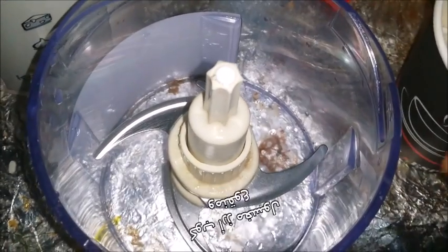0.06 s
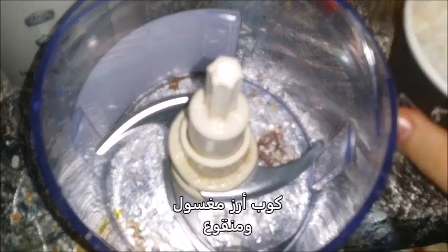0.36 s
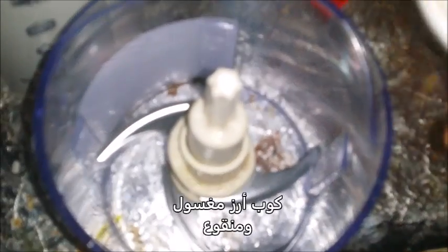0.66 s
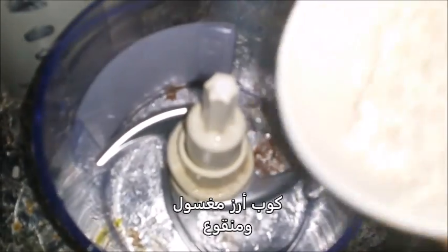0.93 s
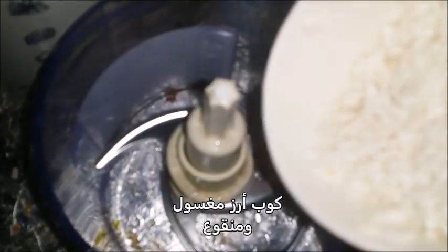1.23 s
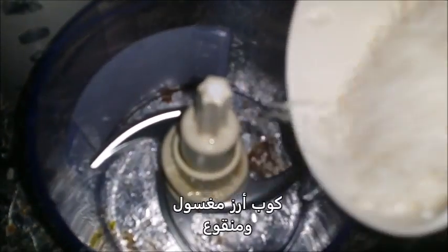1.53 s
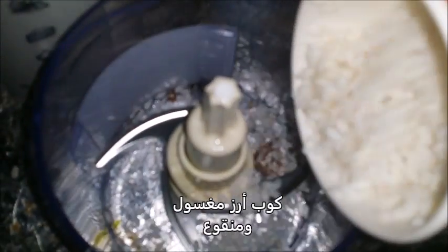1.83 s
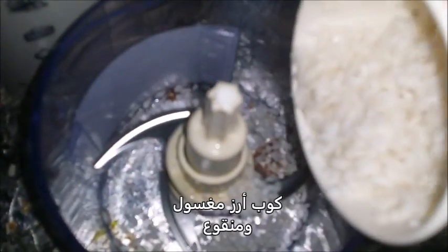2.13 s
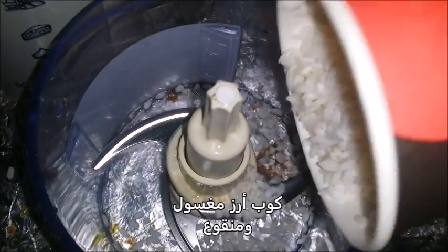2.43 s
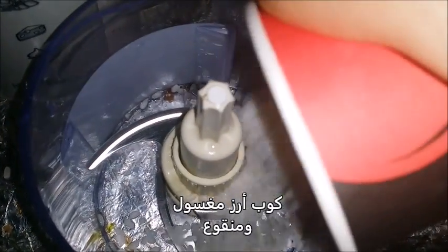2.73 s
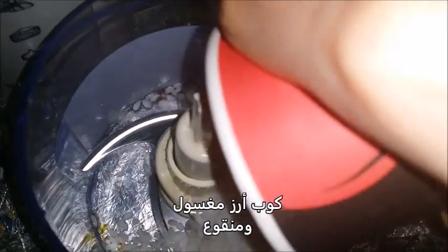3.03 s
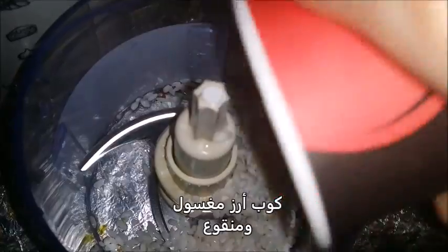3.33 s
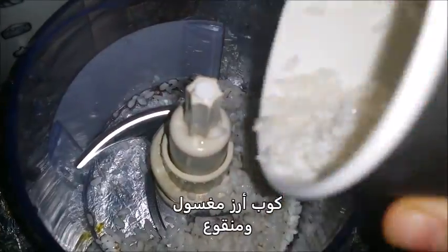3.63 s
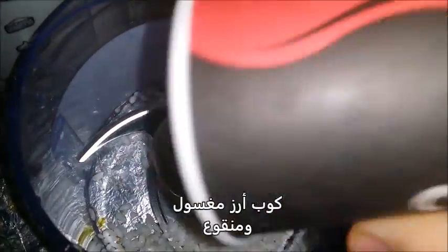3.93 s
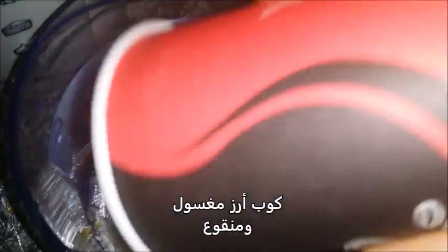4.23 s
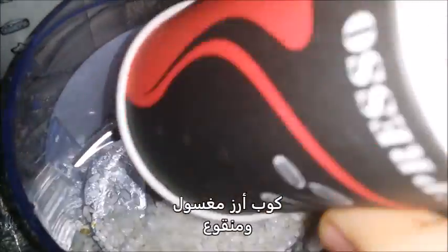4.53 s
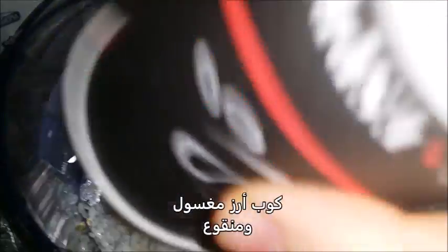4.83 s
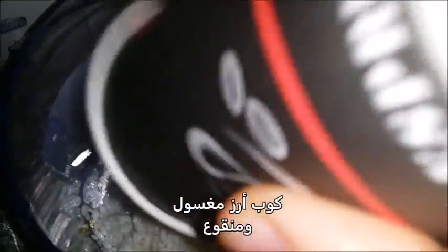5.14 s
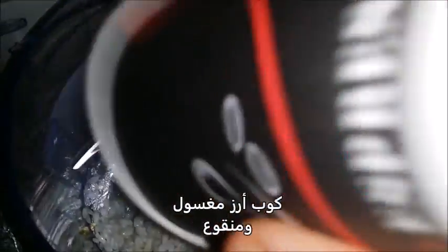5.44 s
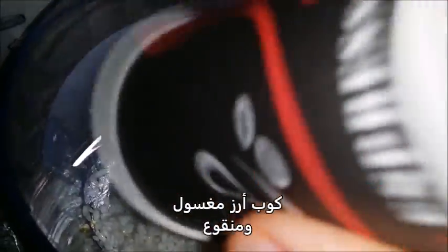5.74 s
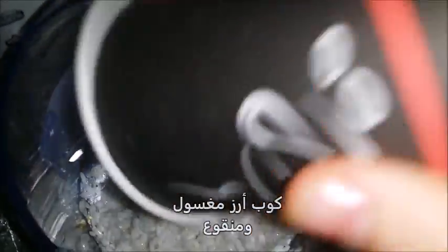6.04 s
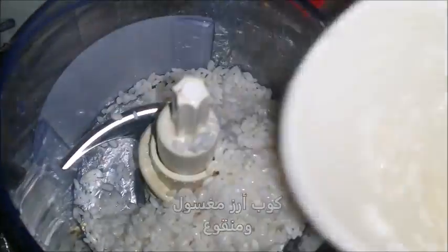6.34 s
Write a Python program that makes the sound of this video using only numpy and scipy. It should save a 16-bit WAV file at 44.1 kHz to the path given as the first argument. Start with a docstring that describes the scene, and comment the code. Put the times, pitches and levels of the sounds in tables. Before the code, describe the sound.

Fingers brush faintly against a paper cup, with a slightly clearer rub at about 0.6 seconds. At 1.1 seconds the first clump of soaked rice lands in a plastic food processor bowl with a soft thud. Wet grains crackle brightly, with tiny sticky snaps and a light patter, swelling from 1.6 to 1.9 seconds and fading just after 2. Following a short pause, a fuller spill runs from 2.7 to 3.3 seconds. Smaller clumps follow, building again between 4.1 and 4.6 seconds while the cup rustles dully. Single hollow knocks on the cup come near 4.7 and 5.2 seconds. From 5.4 to 6.1 seconds it is knocked rapidly, about eleven times a second, shaking out crackling grains. A soft rub and faint scrape finish at around 6.3 seconds. Everything is close, in a small kitchen with a faint low electrical hum and room air.

```python
"""A small kitchen, close to the plastic bowl of a food processor. Fingers pick up a paper cup of
soaked rice and tip it. The wet grains crackle as they part, slide out in clumps and patter in the
bowl; then the cup is knocked about eleven times a second to shake out the rest. Mains hum and room
air lie behind, turned down in the pauses by a noise suppressor."""
import sys
import numpy as np
from scipy import signal
from scipy.fft import rfft, irfft, next_fast_len
from scipy.io import wavfile
from scipy.ndimage import uniform_filter1d, map_coordinates

SR = 44100
rng = np.random.default_rng(int(sys.argv[2]) if len(sys.argv) > 2 else 0)


def transcribe(signal):
    """Save signal, clipped to [-1, 1], as a 16-bit WAV file at the path in sys.argv[1]."""
    frames = np.atleast_2d(signal).T
    limited = np.clip(frames, -1, 1)
    pcm = np.round(limited * 32767).astype(np.int16)
    wavfile.write(sys.argv[1], SR, pcm)


N = 281358
SIDES = np.array([[1], [-1]])  # left, right
MID_FLOW_DB, TOP_HZ = -40, 15820


def amp(db):
    """Decibels to gain."""
    return 10 ** (np.asarray(db) / 20)


def level(power):
    """Power to decibels."""
    return 10 * np.log10(np.abs(power) + 1e-20)


def unit(x):
    """Scale to rms 1."""
    return x / np.sqrt(np.mean(x ** 2) + 1e-20)


def along(points, hz):
    """Interpolate (Hz, value) points on a log axis."""
    point_hz, values = np.transpose(points)
    return np.interp(np.log(hz + 1), np.log(point_hz + 1), values)


def curve(points):
    """Interpolate (seconds, value) points at every sample."""
    return np.interp(np.arange(N) / SR, *np.transpose(points))


def wobble(rate_hz):
    """Smooth random curve, rate_hz knots a second."""
    knots = rng.standard_normal(int(N * rate_hz / SR) + 4)
    return map_coordinates(knots, [np.arange(N) * rate_hz / SR])


def smoothed(x, span_s):
    """Running mean."""
    return uniform_filter1d(x, max(round(span_s * SR), 1))


def swell(peak_s, rise_s, hold_s, fall_s):
    """Power envelope, peak 1; rise and fall times span 30 dB."""
    t = np.arange(N) / SR - peak_s
    away = np.maximum(-t / rise_s, 0) + np.maximum((t - hold_s) / fall_s, 0)
    return amp(-30 * np.minimum(away, 4)) ** 2


def filtered(x, response):
    """Apply a complex frequency response."""
    size = next_fast_len(N + SR // 2)
    return irfft(rfft(x, size) * response(np.fft.rfftfreq(size, 1 / SR)), size)[..., :N]


def coloured(x, spectrum):
    """Impose a spectrum; white input keeps its power."""
    return filtered(x, lambda hz: unit(amp(along(spectrum, hz))))


def resonance(hz, centre_hz, width_hz):
    """Band-pass response, 1 at its centre."""
    return 1j * hz * width_hz / (centre_hz ** 2 - hz ** 2 + 1j * hz * width_hz)


def add(track, start_s, sound):
    """Mix a short sound in place."""
    part = track[max(round(start_s * SR), 0):][:len(sound)]
    part += sound[:len(part)]


def grains(rate_hz, spread_db, life_s, bed_db):
    """Power of tiny uneven bursts over a bed of fine rubbing; mean near 1."""
    size = amp(spread_db * np.minimum(rng.exponential(size=N), 2.6))
    hits = (rng.random(N) < rate_hz / SR) * size ** 2
    pole = np.exp(-2 / (life_s * SR))
    power = np.abs(signal.lfilter([1], [1, -2 * pole, pole ** 2], hits))
    local_mean = np.abs(uniform_filter1d(power, size=1500)) + power.mean() / 10
    bed = amp(bed_db) ** 2
    return (power / local_mean + bed) / (1 + bed)


def scatter(power, coherence, walls_db, walls_s):
    """Stereo noise from a power curve: each grain sounds from a new spot, with new reflections."""
    shared = np.sign(rng.standard_normal(N))
    separate = np.sign(rng.standard_normal((2, N)))
    direct = np.sqrt(power) * (np.sqrt(coherence) * shared + np.sqrt(1 - coherence) * separate)
    pole = np.exp(-1 / (walls_s * SR))
    lingering = np.abs(signal.lfilter([1 - pole], [1, -pole], power))
    return direct + amp(walls_db) * np.sqrt(lingering) * rng.standard_normal((2, N))


def friction(level_db, colour, rate_hz, coherence):
    """Fine-grained rub of a given colour."""
    power = amp(level_db) ** 2 * grains(rate_hz, spread_db=24, life_s=0.005, bed_db=-0.5)
    return coloured(scatter(power, coherence, walls_db=-21, walls_s=0.0072), colour)


# Mains hum and faint higher tones. Each row: frequency in Hz, relative level in dB.
HUM_LINES = [(117.9, 0), (235.8, -4.5), (290, -13), (547, -15), (594, -15), (675, -10)]
# Room air. Each row: frequency in Hz, relative density in dB.
AIR_COLOUR = [(15, -57.5), (25, -19), (82, -22.5), (102, -19), (123, -6.5), (152, -26), (205, -20),
              (275, -11), (392, -29), (440, -16), (560, -11.5), (637, -23), (691, -18.5), (1100, -18.5),
              (1300, -23), (1870, -37), (15800, -43)]


def background():
    """Steady mains hum, out of step at the two microphones, over room air."""
    hum_db, air_db = -59.5, -61
    t = np.arange(N) / SR + 0.00008 * wobble(2) + 0.0008 * SIDES
    hum = sum(amp(db) * np.sin(2 * np.pi * (hz * t + rng.random())) for hz, db in HUM_LINES)
    air = coloured(rng.standard_normal((2, N)) + 0.93 * rng.standard_normal(N), AIR_COLOUR)
    return amp(hum_db) * unit(hum) + amp(air_db) * unit(air)


# Microphone balance. Each row: frequency in Hz, left minus right in dB.
BALANCE = [(125, -2), (250, -6), (500, -2), (1200, -5.5), (2400, -5), (4400, -14), (8000, -7),
           (13000, -6.5)]
# Kitchen reverberation. Each row: frequency in Hz, T60 in seconds.
KITCHEN_T60 = [(150, 0.23), (1500, 0.077), (6000, 0.0556), (15000, 0.037)]


def microphones(x, lag_s, room_db):
    """Sound from the bowl reaches the right microphone first and louder; the kitchen reverberates."""
    balance = lambda hz: amp(SIDES * along(BALANCE, hz) / 2)
    direct = filtered(x, lambda hz: balance(hz) * np.exp(-1j * np.pi * hz * lag_s * SIDES))
    hz, t, noise = signal.stft(rng.standard_normal((2, SR // 3)), SR, nperseg=256)
    decay = amp(-60 * t / along(KITCHEN_T60, hz)[:, None])
    room = signal.istft(noise * decay, SR, nperseg=256)[1]
    reverb = signal.fftconvolve(direct, room / np.linalg.norm(room[0]), axes=1)[:, :N]
    return direct + amp(room_db) * reverb


# Finger strokes. Each row: peak time, rise and fall in seconds, relative skin and wall levels in dB.
STROKES = [(.008, 0.011, 0.059, -53, -55.5), (.15, 0.068, 0.18, -60.5, -64), (.3, 0.39, 0.36, -59, -59.5),
           (.335, 0.032, 0.42, -59, -49.5), (.485, 0.16, 0.049, -59, -64.5), (0.643, .11, 0.085, -44, -56)]
# Skin on paper; the cup's wall. Each row: frequency in Hz, relative density in dB.
SKIN_COLOUR = [(1470, -56), (2500, -23), (4560, -8.5), (5320, -9.5), (6760, -3.5), (8660, -6), (15800, -4)]
WALL_COLOUR = [(120, -13), (200, -3), (241, 7.5), (437, -16), (607, 7), (917, -5), (2990, -13.5),
               (3490, -6.5), (6000, -15), (7800, -45), (13200, -120)]


def pick_up():
    """Fingers brush the paper wall as they take the cup."""
    skin = sum(amp(db) ** 2 * swell(s, rise, 0, fall) for s, rise, fall, db, _ in STROKES)
    wall = sum(amp(db) ** 2 * swell(s, rise, 0, fall) for s, rise, fall, _, db in STROKES)
    hiss = friction(level(skin) + 0.5, SKIN_COLOUR, rate_hz=2000, coherence=0.06)
    return hiss + friction(level(wall) - 2, WALL_COLOUR, rate_hz=330, coherence=0.23)


# Cup tilt. Each row: time in seconds, position (0 upright, 1 tipped over the bowl, 2 upside down).
TILT = [(0, 0), (1.66, 0), (1.7, 1), (3.25, 1), (3.8, 2), (6.38, 2)]
# Cup rub; rim scrape. Each row: time in seconds, level in dB.
RUB_LEVEL = [(5.95, -70), (6.03, -42), (6.07, -73), (6.11, -50), (6.15, -64)]
SCRAPE_LEVEL = [(6.2, -70), (6.31, -55), (6.38, -54.5)]
# Rustle, rub and scrape spectra. Each row: frequency in Hz, relative density in dB.
RUSTLE_COLOUR = [(24, -50), (40, -19), (86, -14.5), (99, -18.5), (113, -14), (170, -5.5), (265, 1.5),
                 (400, -14.5), (659, 0), (869, -14), (1100, 0), (1430, -59), (2420, -120)]
RUB_COLOUR = [(80, -25), (150, -5), (240, 0), (340, -3), (600, -14), (1080, -10), (2000, -40)]
SCRAPE_COLOUR = [(1400, -17.5), (1800, -9.5), (2200, -48.5)]


def handling(flow_db):
    """The held cup rustles dully as rice shifts in it, then rubs and scrapes as it leaves."""
    shifting_db = level(smoothed(amp(flow_db - MID_FLOW_DB) ** 2, span_s=0.383))
    near_db = 3.5 * (curve(TILT) - 1)  # tilting brings the cup closer
    rustle = friction(-64.5 + 0.12 * shifting_db + near_db, RUSTLE_COLOUR, rate_hz=400, coherence=1)
    rub = friction(curve(RUB_LEVEL), RUB_COLOUR, rate_hz=170, coherence=0.34)
    scrape = friction(curve(SCRAPE_LEVEL), SCRAPE_COLOUR, rate_hz=299, coherence=0.6)
    return rustle + rub + scrape


def paper_response(hz):
    """Yielding paper softens the treble; the small cup radiates little bass; the hollow of the bowl makes a dip
    near 2.2 kHz."""
    soft_hz, small_hz = 2200, 110
    low_pass = lambda ratio: 1 / (1 + 1j * np.sqrt(2) * ratio - ratio ** 2)
    high_pass = low_pass(hz / small_hz) * (hz / small_hz) ** 2
    dip = 1 - resonance(hz, centre_hz=2250, width_hz=700)
    return low_pass(hz / soft_hz) * dip * high_pass


# Knocks on the cup. Each row: start in seconds, then relative levels in dB of
# ring, low-mode boost, click and crackle of the loosened grains.
KNOCKS = [(4.65, -32, 5, -41, -66.5), (5.168, -26, -3, -28, -60), (5.3732, -31, 13.5, -41.5, -54),
          (5.466, -28, 10, -32, -39.5), (5.548, -30.5, 14, -30, -35), (5.629, -22.5, 11.5, -24, -36.5),
          (5.718, -24, 11.5, -27.5, -40), (5.809, -21, 5.5, -26.5, -36), (5.8904, -20.5, 4.5, -24, -33.5),
          (5.979, -19, 0.5, -23.5, -36), (6.016, -41, 18.5, -28, -54.5), (6.0656, -22.5, 1.5, -23, -37)]
# Cup modes. Each row: frequency in Hz, relative level in dB, T60 in seconds.
CUP_MODES = [(156, -18, 0.036), (328, -22, 0.011), (480, -8.5, 0.017), (943, -7.5, 0.0093),
             (1118, 0, 0.018), (1228, 1.5, 0.019), (1498, 4, 0.014), (1720, -5, 0.0058), (3170, 1, 0.0028)]
# Knock brightness. Each row: time in seconds, slope around 1300 Hz in dB per octave.
BRIGHTNESS = [(5.17, 9), (5.65, 15.5), (6.07, -13.5)]


def knocks():
    """Each knock rings the cup's well-damped modes, a little differently at every spot."""
    track, t = np.zeros(N), np.arange(SR // 6) / SR
    hz, mode_db, t60_s = np.transpose(CUP_MODES)[:, :, None]
    octaves = np.clip(np.log2(hz / 1300), -0.5, 0.5)
    for start_s, ring_db, boost_db, *_ in KNOCKS:
        spot_db = rng.normal(0, 1.3, hz.shape)
        detune = rng.normal(0, 0.025) + rng.normal(0, 0.015, hz.shape)
        slope_db = np.interp(start_s, *np.transpose(BRIGHTNESS)) * octaves
        strike_db = mode_db + np.where(hz < 700, boost_db, 0) + slope_db + spot_db
        modes = amp(strike_db - 60 * t / t60_s) * np.cos(2 * np.pi * hz * (1 + detune) * t)
        add(track, start_s, amp(ring_db - 5) * modes.sum(0))
    return filtered(track, paper_response)


# Clumps sliding out. Each row: time of full flow, rise, hold and fall in seconds,
# crackle in dB, rub in dB relative to the separate grains, landing in dB.
SPILLS = [(.987, .03, 0.012, .04, -65, -11.5, -96), (1.135, 0.052, 0.063, 0.16, -40.5, -11, -57.5),
          (1.538, .006, 0.0091, 0.028, -55, -20, -80), (1.589, 0.008, 0.057, 0.13, -30.5, -10, -49),
          (1.72, 0.14, 0.084, 0.12, -28.5, 16, -48), (1.95, 0.088, 0.038, 0.09, -51.5, -4, -54),
          (2.011, 0.013, 0.065, 0.089, -38, -12, -52), (2.745, 0.053, 0.12, 0.23, -27.5, -1.5, -44),
          (3.036, 0.056, .01, 0.15, -34, 1, -41), (3.095, 0.1, 0.057, 0.16, -29.5, -2, -43),
          (3.295, 0.083, 0.009, 0.1, -44, -7, -55), (3.455, 0.12, .03, 0.065, -56.5, 7, -61),
          (3.575, 0.032, 0.0035, 0.058, -61.5, 14.5, -54), (3.695, 0.092, 0.0086, 0.048, -45, 22, -53),
          (3.768, 0.053, 0.008, 0.11, -43.5, 6, -56.5), (3.846, 0.018, 0.019, 0.045, -35, -12, -51),
          (3.89, 0.055, 0.046, 0.14, -56, -15, -60), (4.04, 0.049, 0.0045, 0.106, -43, -3, -55.5),
          (4.12, 0.1195, 0.14, 0.29, -42.5, -1, -51), (4.29, 0.12, 0.0308, 0.12, -31.5, -5, -45.5),
          (4.375, 0.087, 0.019, 0.15, -35, -4, -49), (4.53, 0.43, 0.086, 0.081, -35, 7.5, -44.5),
          (4.69, 0.046, 0.034, 0.053, -50.5, -10, -58.5), (4.835, 0.072, 0.0029, 0.14, -57.5, -24, -68),
          (4.99, 0.013, 0.0083, 0.036, -44, -6, -51.5), (5.021, 0.031, 0.0105, 0.052, -44.5, 3, -51),
          (5.11, 0.0055, .008, 0.013, -50.5, -8, -75), (5.166, 0.097, 0.0033, 0.026, -52, -14, -51.5),
          (5.432, .06, 0.013, 0.088, -41.5, -13, -53.5), (5.6, .04, 0.016, 0.075, -42.5, -9, -51),
          (5.835, .03, 0.028, 0.055, -44.5, -11.5, -69), (6.22, .4, .1, 0.99, -54.5, -1, -60)]


def flow():
    """Poured and shaken-out clumps sum to three dB curves: crackle, its share of rubbing, landing."""
    delay_s, shake_envelope_s = 0.0097, (0.02, 0.024, 0.11)
    roll_on = 2.03  # landing grains take this many times longer to settle
    shaken = [(s + delay_s, *shake_envelope_s, db, -20, db - 15) for s, *_, db in KNOCKS]
    moving, rubbing, landing = np.zeros((3, N))
    for peak_s, rise_s, hold_s, fall_s, crackle_db, rub_db, landing_db in list(SPILLS) + shaken:
        clump = amp(crackle_db) ** 2 * swell(peak_s, rise_s, hold_s, fall_s)
        moving += clump
        rubbing += clump * rub_db
        landing += amp(landing_db) ** 2 * swell(peak_s, rise_s, hold_s, fall_s * roll_on)
    return level(moving), rubbing / moving, level(landing)


# Thud on the bare bowl. Each row: frequency in Hz, relative density in dB.
THUD_COLOUR = [(60, -19), (140, -2), (260, 0), (450, -12), (800, -29)]


def thud():
    """The first clump lands with no rice yet to cushion it."""
    power = amp(-53.5) ** 2 * swell(peak_s=1.126, rise_s=0.0033, hold_s=0.0053, fall_s=0.03)
    return coloured(scatter(power, coherence=0.65, walls_db=-19, walls_s=0.007), THUD_COLOUR)


# Bowl cavity. Each row: frequency in Hz, relative density in dB.
BOWL_COLOUR = [(100, -37.5), (300, -13), (700, -12.5), (950, -10), (1250, 1), (1600, -4), (1900, -10),
               (2150, -6), (2700, -9.5), (4000, -10.5)]


def patter(landing_db):
    """Landing grains sound the hollow of the bowl."""
    power = amp(landing_db - 0.5) ** 2 * grains(rate_hz=900, spread_db=5, life_s=0.0026, bed_db=-18)
    return coloured(scatter(power, coherence=0.41, walls_db=-5.5, walls_s=0.0051), BOWL_COLOUR)


def tilt_weight(position):
    """Crossfade weight, 1 while the cup is in this position."""
    return np.clip(1 - abs(curve(TILT) - position), 0, 1)


def trapped_air(x):
    """Air between the tipped cup and the bowl absorbs two narrow bands."""
    absorbed = lambda hz: resonance(hz, 2180, width_hz=240) + 0.55 * resonance(hz, 4050, width_hz=240)
    return x - filtered(tilt_weight(1) * x, absorbed)


# Random colour patches, fast and slow. Each row: depth in dB, width in Hz, length in seconds.
PATCHES = [(2.1, 1100, .012), (1.1, 700, .07)]


def clump_colour(x):
    """Each wet clump, and each stretch of the slide, has its own colour at a steady treble level."""
    hz, t, spectrum = signal.stft(x, SR, nperseg=128)
    colour_db = 0
    for depth_db, width_hz, length_s in PATCHES:
        field = rng.standard_normal(spectrum.shape[1:])
        field = uniform_filter1d(field, max(round(width_hz / hz[1]), 1), axis=0)
        field = uniform_filter1d(field, max(round(length_s / t[1]), 1), axis=1)
        colour_db += depth_db * unit(field)
    gain = amp(colour_db)
    treble = (hz > 5000) & (hz < TOP_HZ)
    gain /= np.sqrt(np.mean(gain[treble] ** 2, axis=0))
    return signal.istft(spectrum * gain, SR, nperseg=128)[1][:, :N]


# Bowl floor modes. Each row: frequency in Hz, width in Hz, relative level in dB.
FLOOR_MODES = [(6110, 150, 1), (6570, 200, -5), (8600, 170, 0), (9370, 150, -8), (11700, 1200, -7),
               (14600, 400, -5.5)]
# Floor ring. Each row: time in seconds, gain in dB.
FLOOR_GAIN = [(1.66, -13.5), (1.72, 13.5), (1.85, 6.5), (2.75, 3.5), (3.2, -72), (3.6, -32.5)]


def floor_ring(grain_noise):
    """The bowl's bare floor rings until rice covers it."""
    modes = lambda hz: sum(amp(db) * resonance(hz, centre, width) for centre, width, db in FLOOR_MODES)
    return filtered(grain_noise * amp(curve(FLOOR_GAIN)), modes)


def burst(rise_s, steepness):
    """Power of one short burst, peak 1; a steep one stops dead."""
    age = (np.arange(SR // 100) / SR / rise_s) ** steepness
    return age * np.exp(1 - age)


# Single wet snaps of grains parting or landing. Each row: start in seconds, relative level in dB.
SNAPS = [(1.0968, -23), (1.0982, -21), (1.117, -27), (1.1258, -14.5), (1.1352, -19), (1.162, -26),
         (1.1813, -15.5), (1.2081, -17), (1.2446, -24), (1.2532, -27), (1.258, -23), (1.2695, -25),
         (1.304, -19), (1.3098, -31), (1.318, -34), (1.376, -37), (1.3798, -27.5), (1.5093, -34),
         (1.5343, -27), (1.5498, -33), (1.578, -13.5), (1.5844, -16), (1.587, -13), (1.642, -14.5),
         (1.698, -14), (1.8375, -14), (1.853, -17.5), (1.8635, -11), (1.896, -20.5), (1.9249, -17),
         (1.9408, -21), (1.9813, -24.5), (2.0042, -24), (2.0109, -21), (2.0175, -23), (2.0681, -14.5),
         (2.0894, -17.5), (2.118, -29), (2.1329, -20), (2.6933, -32), (2.7325, -16), (2.7925, -12),
         (2.9396, -14), (2.9802, -16.5), (3.0014, -15.5), (3.0305, -14), (3.0352, -8), (3.168, -18),
         (3.174, -14), (3.185, -10.5), (3.2264, -21), (3.2587, -19.5), (3.291, -25), (3.3443, -23.5),
         (3.4095, -33.5), (3.798, -21.5), (3.8025, -10.5), (3.8395, -13), (3.8506, -16), (3.862, -15),
         (3.9374, -27), (4.0445, -17), (4.0674, -33), (4.0966, -22), (4.12, -16), (4.2009, -17.5),
         (4.2546, -10), (4.3034, -13.5), (4.6128, -18), (4.7167, -36), (4.7919, -34), (4.8495, -38),
         (4.943, -40), (4.9799, -30), (4.9955, -25), (5.0204, -19), (5.0238, -18.5), (5.0268, -16.5),
         (5.0607, -22.5), (5.1316, -20.5), (5.1485, -23), (5.189, -32), (5.4315, -24.5), (5.438, -21.5),
         (5.51, -16), (5.553, -16), (5.555, -12.5), (5.5712, -9.5), (5.6796, -30), (5.7369, -18),
         (5.7773, -19), (5.8311, -16), (5.8361, -18), (5.9324, -18), (5.9689, -15), (6.0494, -24),
         (6.0535, -19), (6.1281, -28), (6.1546, -27)]
# Crackle spectrum per cup position. Each row: frequency in Hz, relative density in dB.
UPRIGHT_COLOUR = [(1120, -48), (1900, -21), (2990, -15.5), (3470, -10), (4990, -5), (5650, 0.5),
                  (6870, -5.5), (7990, 2), (9700, -1.5), (13800, 1.5), (15800, -10)]
TIPPED_COLOUR = [(1120, -47), (1900, -8), (2210, -52), (2660, -16), (3440, -11.5), (4000, -16.5),
                 (4410, -11.5), (6230, 0), (7240, -4), (8800, 0.5), (10100, 0), (11400, 3), (13700, 0.5),
                 (14800, 3), (15800, -8.5)]
UPTURNED_COLOUR = [(1120, -14.5), (1900, -7), (2080, -13.5), (2520, -9.5), (3290, -9.5), (3930, -7),
                   (4730, 0.5), (5600, 2.5), (6510, 1.5), (11600, 5.5), (13200, 6), (15800, -3)]


def crackle(flow_db, rub_db):
    """Wet grains crackle as they part, denser with more flow; snaps and knock clicks stand out."""
    excess_db = flow_db - MID_FLOW_DB
    clumps_db = 2.1 * wobble(110) + 1.7 * wobble(600)
    spread_db = 9 - 0.099 * np.maximum(excess_db, 0)  # fewer grains stand out of a sliding mass
    texture = grains(1400 * amp(0.5 * excess_db), spread_db, life_s=0.00077, bed_db=rub_db)
    power = amp(flow_db + clumps_db + 0.57) ** 2 * texture
    for start_s, snap_db in SNAPS:
        add(power, start_s, amp(snap_db - 7.5) ** 2 * burst(rise_s=0.0005, steepness=1.51))
    for start_s, _, _, click_db, _ in KNOCKS:
        add(power, start_s, amp(click_db + 4) ** 2 * burst(rise_s=0.001, steepness=1))
    grain_noise = scatter(power, coherence=0.2, walls_db=-14, walls_s=0.001)
    body = sum(coloured(grain_noise * tilt_weight(position), colour)
               for position, colour in enumerate([UPRIGHT_COLOUR, TIPPED_COLOUR, UPTURNED_COLOUR]))
    low_cut_hz = 500  # grains are too small to make bass
    body = filtered(body, lambda hz: 1j * hz / (low_cut_hz + 1j * hz))
    return body + floor_ring(grain_noise)


# Drift of the landing spot. Each row: time in seconds, left minus right in dB.
DRIFT = [(1.2, 0.1), (1.75, 1.5), (2.05, 3), (2.8, -0.7), (3.2, 2), (3.8, 0), (4.3, 0), (6, -0.6)]


def scene():
    """Rice, cup and hand above the bowl, in the kitchen."""
    flow_db, rub_db, landing_db = flow()
    rice = trapped_air(clump_colour(crackle(flow_db, rub_db)) + patter(landing_db) + thud())
    rice = microphones(rice * amp(SIDES * curve(DRIFT) / 2), lag_s=0.00003, room_db=-8.5)
    cup = microphones(knocks() + handling(flow_db), lag_s=0.00015, room_db=-9)
    return rice + cup + pick_up() + background()


def record(dry):
    """A noise suppressor cuts the low band when the treble is quiet; a steep low-pass follows."""
    split_hz, open_db, cut_db_per_db, max_cut_db, react_s = 1660, -43, 0.33, 13, 0.11
    low = filtered(dry, lambda hz: 1 / (1 + (hz / split_hz) ** 6))
    treble = dry - low
    treble_power = smoothed(np.mean(treble ** 2, axis=0), span_s=0.0057)
    treble_db = smoothed(level(treble_power), react_s)
    cut_db = np.clip(cut_db_per_db * (open_db - treble_db), 0, max_cut_db)
    return filtered(treble + amp(-cut_db) * low, lambda hz: 1 / (1 + (hz / TOP_HZ) ** 400))


dry = scene()
out = record(dry)
transcribe(out)
```